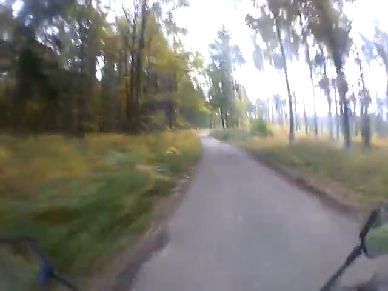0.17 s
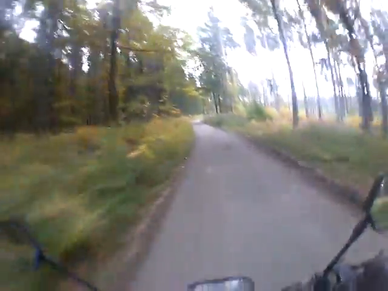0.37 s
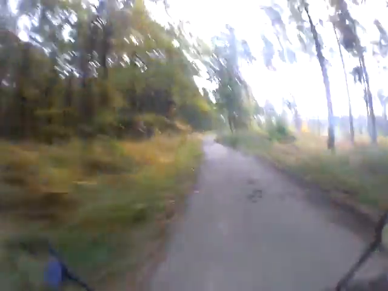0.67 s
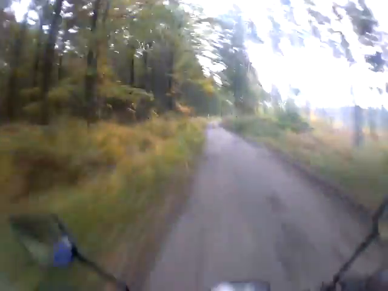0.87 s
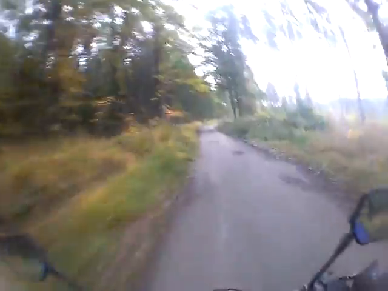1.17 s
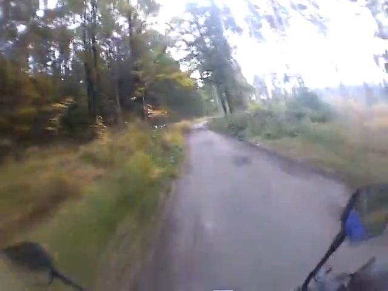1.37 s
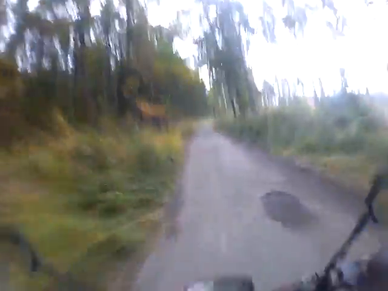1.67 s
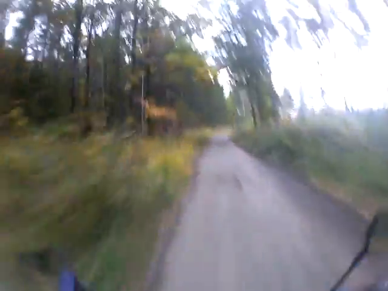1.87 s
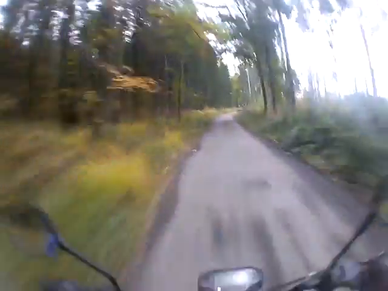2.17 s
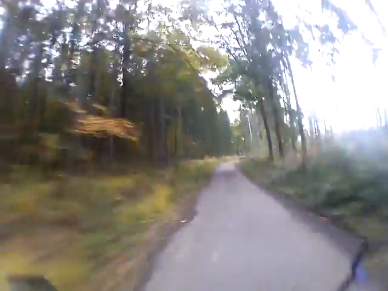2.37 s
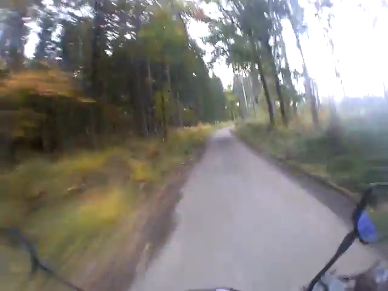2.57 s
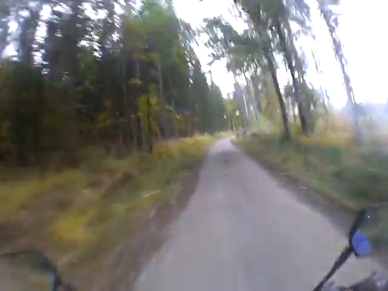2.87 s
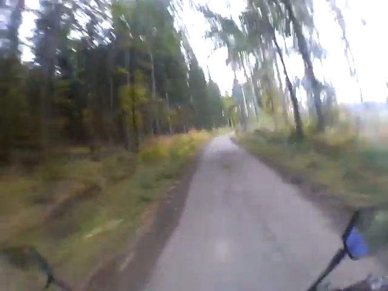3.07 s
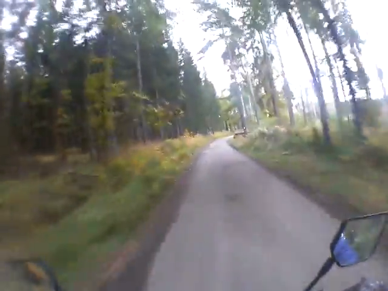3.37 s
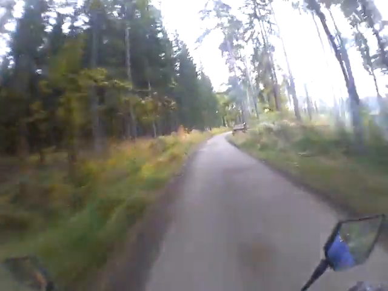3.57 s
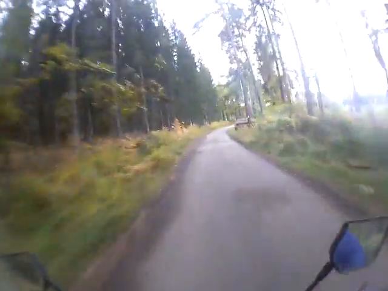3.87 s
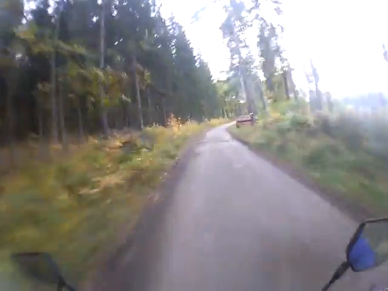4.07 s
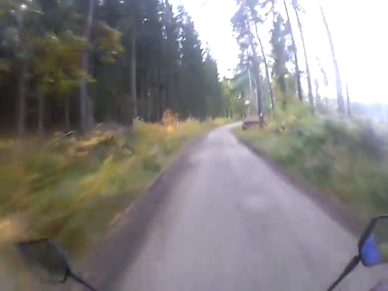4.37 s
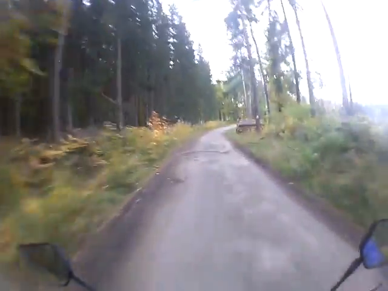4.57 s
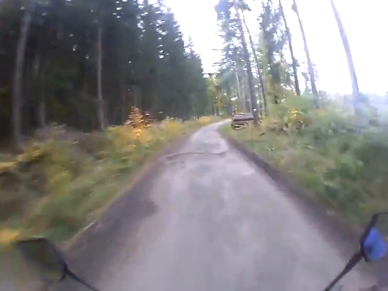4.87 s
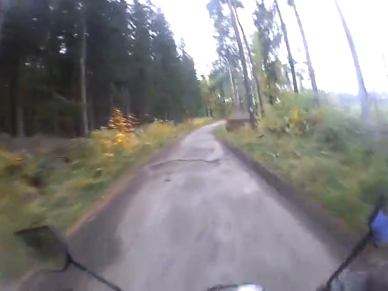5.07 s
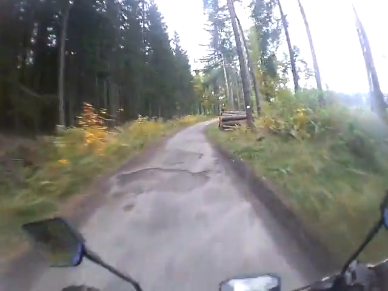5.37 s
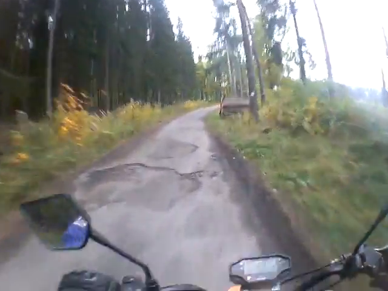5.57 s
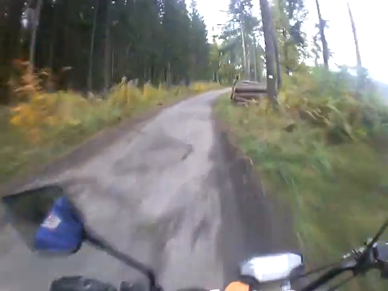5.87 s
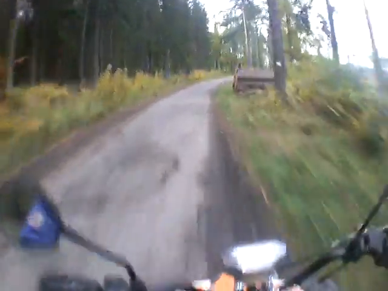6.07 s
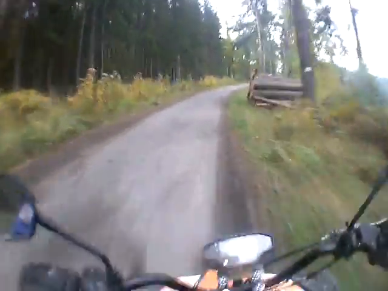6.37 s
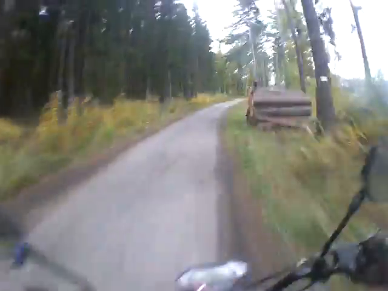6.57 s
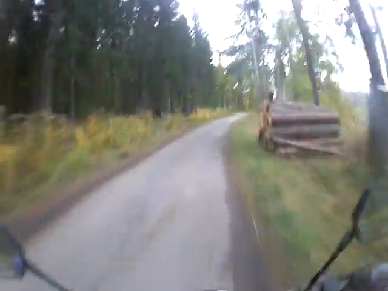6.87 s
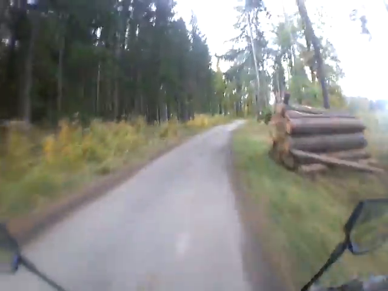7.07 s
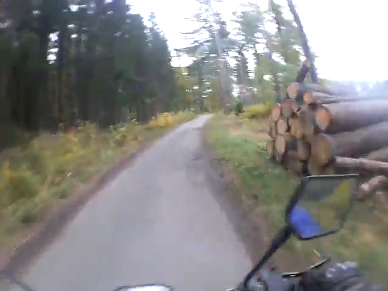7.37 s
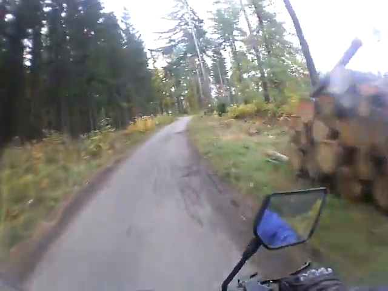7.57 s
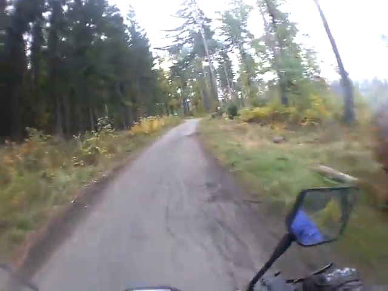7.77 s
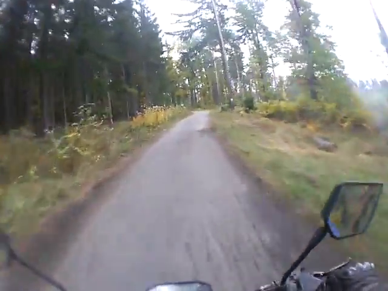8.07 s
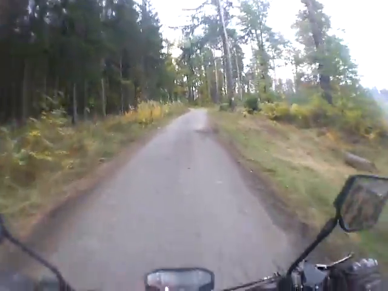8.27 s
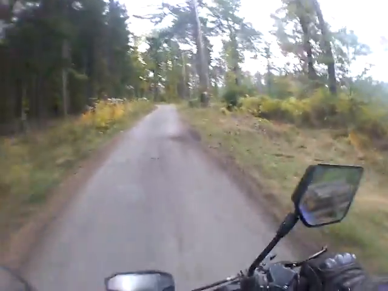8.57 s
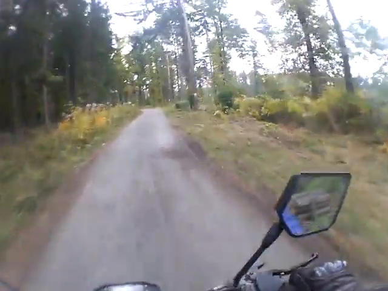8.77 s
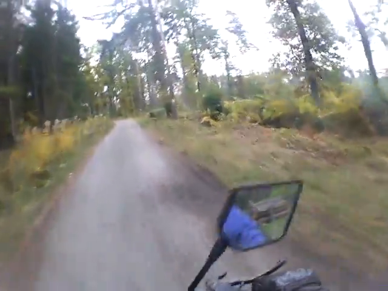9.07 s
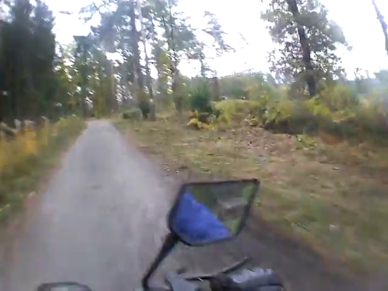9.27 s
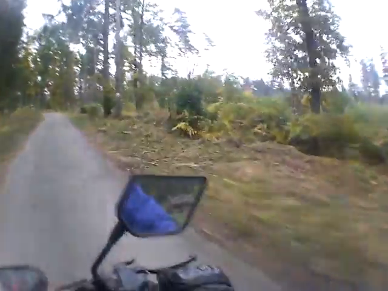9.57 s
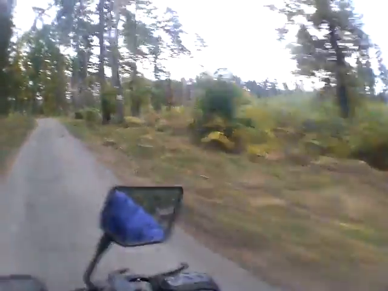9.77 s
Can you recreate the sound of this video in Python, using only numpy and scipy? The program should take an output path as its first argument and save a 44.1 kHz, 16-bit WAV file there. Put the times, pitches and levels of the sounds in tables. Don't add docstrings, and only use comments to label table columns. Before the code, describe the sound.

Outdoors on a forest track, a four-stroke engine runs hard at first, its rough exhaust drone mixed with whine and valve rattle. After about three seconds it winds down to a quieter, uneven putter, then growls and gradually climbs to a middling pitch. Wind batters the rider's close microphone with low rumble, faint hiss and distorted thuds, easing somewhat later.

```python
import sys
import numpy as np
from scipy import signal
from scipy.io import wavfile
from scipy.ndimage import uniform_filter1d

SR = 44100
rng = np.random.default_rng(int(sys.argv[2]) if len(sys.argv) > 2 else 0)


def put_to_file(sound):
    columns = np.atleast_2d(sound).T
    safe = np.clip(columns, -1, 1)
    whole_steps = np.round(safe * 32767)
    wavfile.write(sys.argv[1], SR, whole_steps.astype(np.int16))


def convert_level_to_amplitude(level_db):
    exponent = np.asarray(level_db, float) / 20
    return 10 ** exponent


N = 437891

# (t/s, firing rate f/Hz, exhaust level/dB, mechanical effort level/dB)
ENGINE = [(0, 51.85, -21, -33.5), (.6, 53.92, -23.5, -34.5), (2.2, 57.22, -23, -33.5),
          (2.92, 57.5, -26, -33), (2.99, 57.02, -28.5, -37), (3.25, 54.76, -26, -38.5),
          (3.71, 48.95, -26.5, -40), (4.26, 37.46, -28, -44.5), (4.8, 30.23, -34, -49),
          (5.25, 29.31, -35.5, -50), (5.62, 28.1, -26, -44.5), (6.25, 31, -24.5, -40.5),
          (6.8, 31.33, -26, -41), (7.25, 33, -29.5, -42.5), (7.7, 33.4, -31.5, -41.5),
          (8.35, 35.65, -27, -40), (9.6, 38.4, -29.5, -39), (9.93, 38.7, -31.5, -38.5)]
# (t/s, throttle 0-1)
THROTTLE = [
    (0, 0.95),
    (1.6, 0.53),
    (2.9, 0.9),
    (3.45, 0.22),
    (3.7, 0),
    (5.08, 0.05),
    (5.24, 0.55),
    (9.93, 0.62),
]
# (t/s, drop of the firing rate f/Hz)
JOLTS = [
    (.52, 0.66),
    (1.85, 1),
    (2.29, 1.5),
    (3.02, 3.13),
]
# (firing rate f/Hz, crank hum level/dB, airbox ring level/dB)
FRAME = [(29.8, -20.5, -32), (30.81, -26, -16), (33, -23.5, -7), (33.53, -18, -2), (36.9, -17, -9),
         (38.7, -26.5, 4.5), (46.3, -32, -12), (51, -20, -7), (57.5, -24, -24)]
# (f/Hz, width/Hz, level/dB)
SILENCER = [(298, 50, -4.5), (303.8, 24, 5), (329.3, 29, 2.5), (366, 66, -3.5), (421.4, 29, -6.5)]
# (f/Hz, width/Hz, level/dB)
HEADER = [(150, 34, -13)]
# (f/Hz, width/Hz, level/dB)
COLD_SILENCER = [(129, 63, -1.5), (197, 91, -5.5), (267.6, 27.7, 5), (328, 80, -5), (404, 41, -7.5)]
# (f/Hz, width/Hz, level/dB)
PIPE = [(520.6, 174, 1.5), (550.5, 45, 6), (652, 59, -7.5), (800.3, 36.6, 3), (875, 117, -4.5)]
# (f/Hz, width/Hz, level/dB)
CASING = [(1353, 148, -0.5), (1881, 104, 5.5), (2070, 115, 2), (2600, 600, -7.5)]
# (f/Hz, width/Hz, level/dB)
AIRBOX = [(2265, 160, 0)]
# (f/Hz, width/Hz, level/dB)
VALVE_COVER = [(3142, 220, -2), (3816, 203, 1), (4265, 163, 1.5), (4754, 146, -3), (5320, 300, -11.5)]
# (f/Hz, width/Hz, level/dB, delay/ms)
COVERS = [(1878, 98, -1, 8), (2266, 210, -9, 6), (3797, 91, -8.5, 3), (4260, 100, -4.5, 1),
          (5085, 120, -13, 2)]
# (multiple of the firing rate, level/dB)
WHINE = [(4, -6.5), (5, -2), (8, -38.5), (10, -3.5), (12, -15.5), (15, -45)]
# (t/s, rumble level/dB at the top)
GUSTS = [(.16, -14), (.55, -22), (.85, -14), (1.02, -11.5), (1.35, -31), (1.58, -35), (1.729, -9.5),
         (2.07, -20), (2.37, -13), (2.56, -9.5), (2.79, -15), (3.04, -13), (3.26, -14), (3.51, -17.5),
         (3.79, -14.5), (4.12, -12.5), (4.5, -16.5), (4.68, -11), (4.87, -15.5), (5.12, -19), (5.4, -18),
         (5.65, -31), (6.45, -15), (7.15, -13.5), (7.4, -17), (8.2, -26), (8.52, -13), (9.26, -27),
         (9.43, -33), (9.73, -32)]
# (f/Hz, width/Hz, level/dB)
FAIRING = [(6320, 950, 5.5), (7890, 250, 3), (9000, 3400, -5), (10700, 450, -2), (13100, 830, -2.5),
           (15000, 1200, -20)]
# (t/s, swing level/dB, width/ms, next eddy's level/dB against the first)
THUMPS = [(0.122, 0.5, 4.4, 0), (.831, 6.5, 4.3, -3.5), (0.891, -5, 3.3, -22), (0.926, .5, 4.6, -17),
          (0.987, -4, 4.8, -4), (1.432, -4, 5.3, -22), (1.702, -2, 4.3, 7), (1.862, 1, 4.4, -7),
          (1.916, -2, 8.9, -20), (2.134, 1.5, 4.2, 2), (2.497, 0, 4.5, -12), (2.608, -0.5, 6, -20),
          (2.701, 1, 6.8, -23), (2.998, -6, 6.3, -17), (3.076, -1, 4.6, -5), (3.159, -5.5, 6.2, 9),
          (3.8, -6.5, 7.6, -24), (4.007, .5, 6.1, -8), (4.045, -5, 6.8, -1), (4.339, -3.5, 5.8, -19),
          (5.164, -2.5, 6, 5), (6.128, -4.5, 7.7, -5), (6.418, -9, 4.97, 2), (6.517, 4, 4.9, -10),
          (7.153, 6, 4.45, -7), (7.198, 5, 4.9, -5), (7.25, 3, 4.6, -3), (7.324, 0, 5.4, -3),
          (7.534, 1.5, 4.8, -11), (8.245, 5, 4.2, -8.5)]
# (t/s, peak level/dB, lowest f/Hz, highest f/Hz, decay/ms)
TICKS = [(2.37, -21, 1689, 4103, 4), (2.374, -14.5, 1740, 2600, 6.6), (2.426, -35, 4000, 11960, .6),
         (2.583, -33, 5000, 15000, .6), (2.605, -36, 5000, 15000, .6), (2.803, -25, 8100, 15470, 1.5),
         (3.078, -19.5, 1700, 2912, 4.4), (7.222, -29, 4010, 12000, .6), (7.282, -35, 3980, 15500, 0.59),
         (7.854, -36, 3000, 9000, .9), (8.093, -34, 2998, 9000, 1)]

WHINE_FROM_HZ, WHINE_SPAN_HZ, WHINE_QUIET_DB, WHINE_LOUD_DB = 51.24, 0.43, -60.5, -26
COAST_HUM_DB, COAST_AIRBOX_DB, COAST_WHINE_DB = -5.5, -10, -5
PIPE_DB, PIPE_SLOPE = -33.5, 0.78
HISS_DB, HISS_SLOPE = -55.5, 0.87
BUFFET_DB, BUFFET_SLOPE = -29.5, .5
JOLT_S, GUST_S, LULL_DB = .06, 0.066, -22
EDDY_S, LAST_EDDY_DB = 0.01616, -10.5
SNAP_FROM_DB, SNAP_UNDER_MS, SNAP_DB, SNAP_LATE_S = 0.5, 5.9, -37.5, .003
SECOND_STROKE, EXHAUST_LEAD_S, PIPE_LATE_S = .16, .007, 0.003914
COVER_SHARE = 1.05


def unit(x):
    return x / np.sqrt(np.mean(x ** 2))


def steady(x, span_s=0.084):
    return x / np.sqrt(uniform_filter1d(x ** 2, int(span_s * SR)) + 1e-12)


def curves(table):
    s, *columns = np.transpose(table)
    return [np.interp(np.arange(N) / SR, s, c) for c in columns]


def bumps(rows, width_s):
    t = np.arange(N) / SR
    return sum(h * np.exp(-((t - s) / width_s) ** 2 / 2) for s, h in rows)


def walk(rate):
    k = int(SR / rate)
    held = np.repeat(rng.standard_normal(N // k + 1), k)
    return 1.377 * uniform_filter1d(uniform_filter1d(held, k), k)[:N]


def noise():
    return rng.standard_normal(N)


def band(x, lo_hz, hi_hz, order=2):
    edges = [lo_hz, min(hi_hz, .45 * SR)]
    return signal.sosfilt(signal.butter(order, edges, "band", fs=SR, output="sos"), x)


def ring(x, modes):
    out = 0
    for k, (hz, width, db) in enumerate(modes):
        b, a = signal.iirpeak(hz, hz / width, SR)
        out = out + (-1) ** k * convert_level_to_amplitude(db) * signal.lfilter(b, a, x)
    return out


def puffs(strikes, delay_ms, rise_ms, fall_ms, floor):
    t = np.clip(np.arange(2500) / SR * 1000 - delay_ms, 0, None)
    shape = np.exp(-t / fall_ms) * (1 - np.exp(-t / rise_ms))
    return signal.fftconvolve(strikes, shape / shape.max())[:N] + floor


def scatter(cycle):
    return rng.standard_normal(700)[cycle]


def push(strikes):
    return signal.sosfilt(signal.butter(4, 1150, fs=SR, output="sos"), strikes)


def exhaust(turns, firing, gas, throttle):
    half_beat = 1. * np.diff((turns + .5).astype(int), prepend=0)
    both = firing + SECOND_STROKE * push(half_beat)
    hot = unit(ring(both, SILENCER) + ring(firing, HEADER)) + .18 * unit(ring(gas, SILENCER))
    cold = unit(ring(firing, COLD_SILENCER)) + .45 * unit(ring(gas, COLD_SILENCER))
    return np.roll(steady(throttle * hot + (1 - throttle) * cold), -int(EXHAUST_LEAD_S * SR))


def upper_pipe(firing, gas, throttle):
    late = np.roll(firing, int(PIPE_LATE_S * SR))
    return steady((.5 + .4 * throttle) * unit(ring(late, PIPE)) + .55 * unit(ring(gas, PIPE)))


def covers(beat, cycle):
    size = convert_level_to_amplitude(3.2 * rng.standard_normal((700, len(COVERS))))[cycle].T * np.sign(noise())
    out = 0
    for a, (hz, width, db, ms) in zip(size, COVERS):
        tap = ring(beat * a, [(hz, width, db)])
        bead = ring(tap, [(hz, width, 0)])
        out = out + np.roll(bead, int(ms * SR / 1000))
    return unit(out)


def clatter(beat, cycle, blur, valves, airbox_db):
    knock = puffs(beat * convert_level_to_amplitude(2.9 * scatter(cycle)), 6.24, 2.5, 4.3, 0.95 * blur) * noise()
    intake = puffs(beat, 14.3, 1.5, 2.5, 0.16) * noise()
    casing = unit(ring(knock, CASING)) + convert_level_to_amplitude(airbox_db) * unit(ring(intake, AIRBOX))
    valve_cover = convert_level_to_amplitude(-5.5) * unit(ring(valves * noise(), VALVE_COVER))
    mix = casing + COVER_SHARE / blur * covers(beat, cycle) + valve_cover
    return steady(mix, 0.1) * convert_level_to_amplitude(0.46 * walk(8.3))


def crank_hum(turns):
    return np.sqrt(2) * np.sin(4 * np.pi * turns) * convert_level_to_amplitude(1.7 * walk(14) + 1.1 * walk(4))


def drive_whine(turns):
    return sum(convert_level_to_amplitude(db + 2.5 * walk(5.38)) * np.sin(2 * np.pi * k * turns) for k, db in WHINE)


def engine():
    hz, exhaust_db, clatter_db = curves(ENGINE)
    hz = hz - bumps(JOLTS, JOLT_S)
    throttle = np.clip(curves(THROTTLE)[0], 0, 1)
    coast = 1 - throttle
    turns = np.cumsum(hz * (1 + .004 * walk(25))) / SR
    cycle = turns.astype(int)
    beat = np.diff(cycle, prepend=0)
    blur = 1.42 * (hz / 33) ** 1.5 + 2.1 * coast

    speeds, hum_db, ring_db = np.transpose(FRAME)
    crank_db = np.interp(hz, speeds, hum_db) + COAST_HUM_DB * coast
    airbox_db = np.interp(hz, speeds, ring_db) + COAST_AIRBOX_DB * coast
    singing = 1 / (1 + np.exp((WHINE_FROM_HZ - hz) / WHINE_SPAN_HZ))
    whine_db = WHINE_QUIET_DB + (WHINE_LOUD_DB - WHINE_QUIET_DB) * singing + COAST_WHINE_DB * coast
    pipe_db = PIPE_DB + PIPE_SLOPE * (clatter_db + 40)

    strength = beat * convert_level_to_amplitude((.6 + 1.2 * coast) * scatter(cycle))
    firing = push(strength)
    gas = push(puffs(strength, 4.7, 6.6, 48, blur) * noise())
    valves = puffs(beat * convert_level_to_amplitude(2.2 * scatter(cycle)), 0, 1.2, 7, .5 * blur)

    out = convert_level_to_amplitude(exhaust_db + 1.5) * exhaust(turns, firing, gas, throttle)
    out = out + convert_level_to_amplitude(pipe_db - 2.0) * upper_pipe(firing, gas, throttle)
    out = out + convert_level_to_amplitude(clatter_db - 0.5) * clatter(beat, cycle, blur, valves, airbox_db)
    out = out + convert_level_to_amplitude(crank_db + 1.0) * crank_hum(turns)
    out = out + convert_level_to_amplitude(whine_db) * drive_whine(turns)
    return out, steady(valves, 0.57)


def wind(valves):
    effort = curves(ENGINE)[2] + 40
    buffet_db = BUFFET_DB + BUFFET_SLOPE * effort + 1.1 * walk(5)
    hiss_db = HISS_DB + HISS_SLOPE * effort
    gusts = convert_level_to_amplitude(LULL_DB) + bumps([(s, convert_level_to_amplitude(db)) for s, db in GUSTS], GUST_S)
    rumble = steady(band(noise(), 3.98, 20.8, order=3), 0.269)
    buffet = unit(band(noise(), 9.4, 126) + 0.068 * band(noise(), 103, 168, order=3))
    buffet = buffet * convert_level_to_amplitude(1.7 * walk(16))
    hiss = 0
    for mode in FAIRING:
        hiss = hiss + ring((valves ** 1.4 + .5) * noise(), [mode]) * convert_level_to_amplitude(1.6 * walk(14))
    hiss = unit(hiss) * convert_level_to_amplitude(.9 * walk(8))
    return gusts * rumble + convert_level_to_amplitude(buffet_db + 3) * buffet + convert_level_to_amplitude(hiss_db - 1.0) * hiss


def eddies():
    return [(s + k * EDDY_S, db + step, ms) for s, db, ms, next_db in THUMPS
            for k, step in enumerate((0, next_db, next_db + LAST_EDDY_DB))]


def thumps():
    out, t = np.zeros(N + 8000), np.arange(-2000, 2000) / SR
    for s, db, ms in eddies():
        u = t / (ms * 0.00059)
        at = int(s * SR) + 2000
        out[at:at + 4000] += convert_level_to_amplitude(db - 3.5) * (1 - 0.91 * u ** 2) * np.exp(-u ** 2 / 2)
    return out[4000:4000 + N]


def ticks():
    out, t = np.zeros(N + 2000), np.arange(2000) / SR
    snaps = [(s + SNAP_LATE_S, SNAP_DB + db, 3500, 13000, 1.1) for s, db, ms in eddies()
             if db > SNAP_FROM_DB and ms < SNAP_UNDER_MS]
    for s, db, lo_hz, hi_hz, ms in TICKS + snaps:
        burst = band(rng.standard_normal(2000) * np.exp(-t * 1000 / ms), lo_hz, hi_hz)
        at = int(s * SR) - 30
        out[at:at + 2000] += convert_level_to_amplitude(db) * burst / np.abs(burst).max()
    return out[:N]


def scene():
    motor, valves = engine()
    return (motor + wind(valves) + thumps() + ticks())[None]


def band_limit(x):
    return signal.sosfilt(signal.butter(12, 15720, fs=SR, output="sos"), x)


def record(dry):
    overloaded = np.clip(dry, -.92, .97)
    return band_limit(overloaded)


dry = scene()
out = record(dry)
put_to_file(out)
```